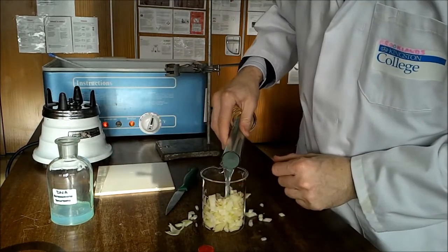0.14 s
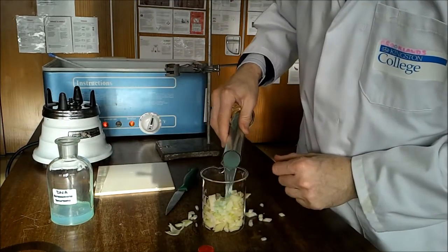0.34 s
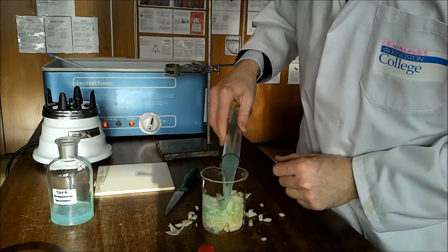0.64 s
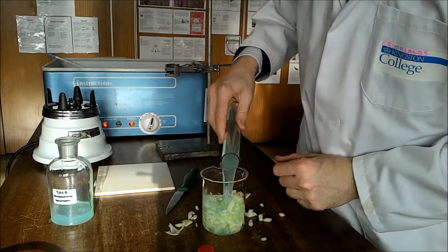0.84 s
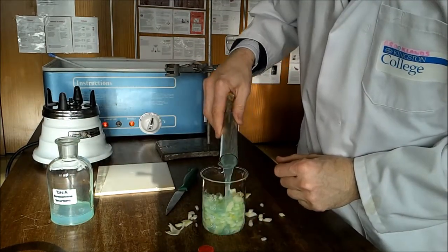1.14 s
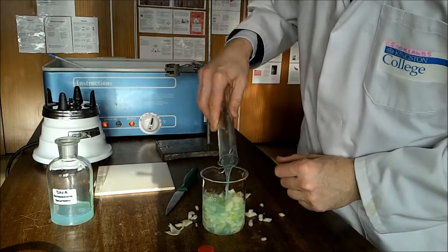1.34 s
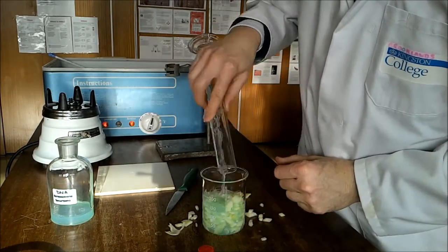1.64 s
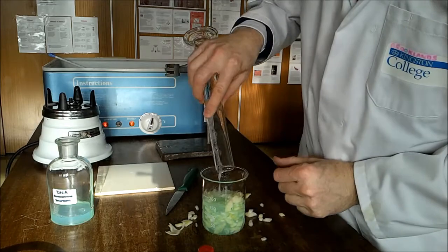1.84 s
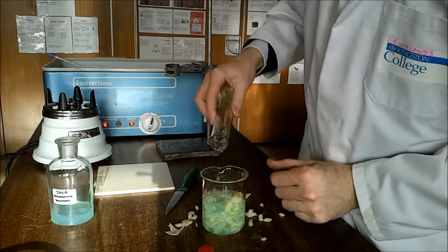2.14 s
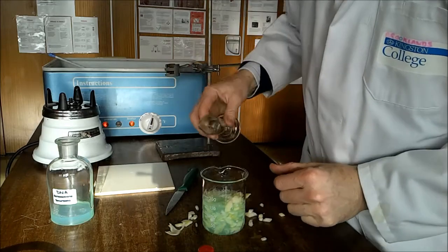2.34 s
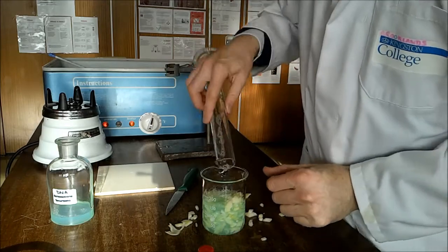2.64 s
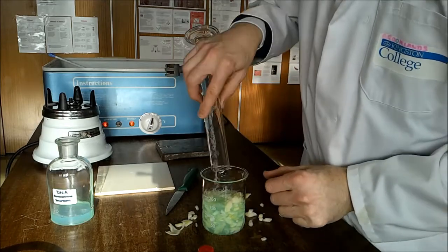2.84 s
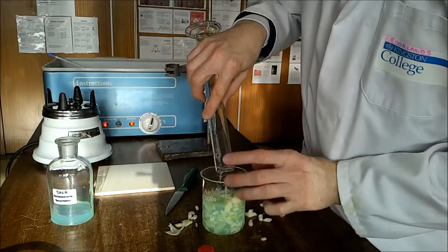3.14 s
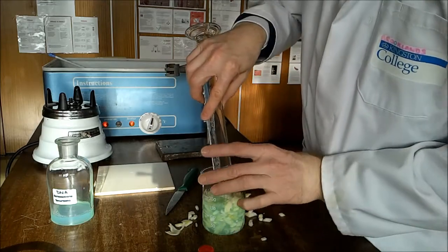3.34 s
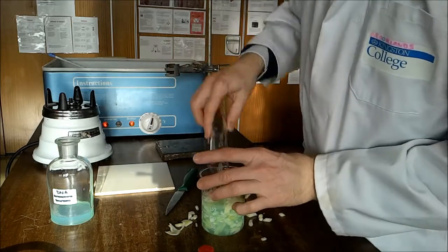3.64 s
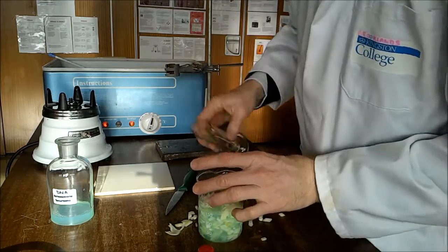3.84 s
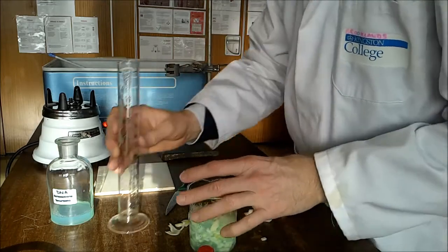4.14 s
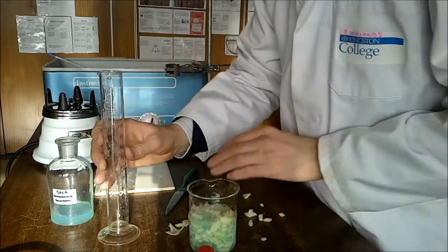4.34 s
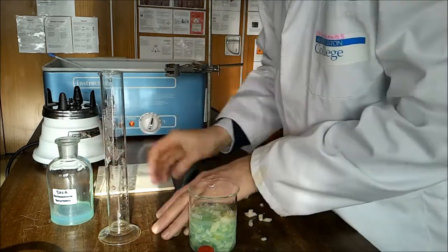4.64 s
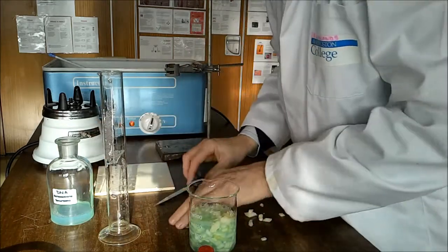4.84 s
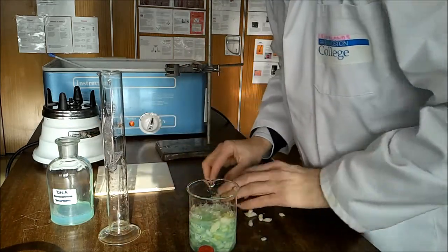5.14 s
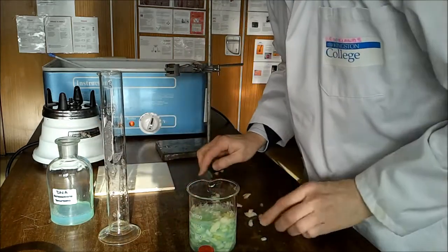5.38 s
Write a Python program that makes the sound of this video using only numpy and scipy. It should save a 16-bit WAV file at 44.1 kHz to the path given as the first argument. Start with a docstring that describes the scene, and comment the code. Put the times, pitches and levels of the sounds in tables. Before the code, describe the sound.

A small laboratory with low, steady ventilation air and slight hiss, heard close in mono. From about 0.5 to 1.5 s a thin stream trickles into chopped onion in a beaker: fine irregular ticks and small, high, wet plips, quite faint. A soft glass touch comes at 1.0 s and a light clink at 1.06. Clear, short clinks of the empty cylinder on the beaker rim follow at 1.5, 1.85, 3.0 and 3.3 s, with fainter touches at 3.5 and 3.6; between them it is nearly silent. Cloth brushes softly near 3.4 s. From 3.95 to 4.2 s the beaker bumps and scuffs dully. At 4.3 s the cylinder's heavy foot lands on the wooden bench, by far the loudest sound, a sharp ringing knock with a short room echo. Sleeves rustle around 4.6 s, a knife rasps waveringly at 4.85 to 5.0 s, and soft rustles fade to 5.6 s.

```python
"""A glass measuring cylinder is emptied over chopped onion in a beaker and tapped on the rim to shed the last drops.
Struck glass and wood are sums of dying tones plus a short crack; drops are rising bubble tones in a fine trickle.
The beaker is nudged, the cylinder is stood on the wooden bench with a knock, and a wavering, rasping knife is slid.
Coat sleeves and room air are coloured noise, small sounds echo in the room, and a gain control ducks loud blows."""
import sys
import numpy as np
from scipy import signal
from scipy.fft import irfft, next_fast_len
from scipy.io import wavfile
from scipy.ndimage import uniform_filter1d

SR = 44100
rng = np.random.default_rng(int(sys.argv[2]) if len(sys.argv) > 2 else 0)


def generate_wav(signal):
    """Clip the signal to [-1, 1] and save it as 16-bit WAV at the path in sys.argv[1]."""
    frames = np.transpose(np.atleast_2d(signal))
    scaled = np.clip(frames, -1, 1) * 32767
    pcm = np.round(scaled).astype(np.int16)
    wavfile.write(sys.argv[1], SR, pcm)


N = 242991
TIME_S = np.arange(N) / SR
POUR_START_S, POUR_FULL_S, POUR_END_S = 0.5, 1.5, 1.48  # the pour stops just before it would reach full flow


def amp(db):
    """Turns decibels into a gain."""
    return 10 ** (np.asarray(db) / 20)


def unit(x):
    """Scales a sound to an average (rms) level of 1."""
    return x / np.sqrt(np.mean(x ** 2) + 1e-20)


def read(points, hz):
    """Reads a table of (frequency, value) along a log-frequency axis."""
    f, value = np.transpose(points)
    return np.interp(np.log(hz + 1), np.log(f + 1), value)


def add(mix, s, sound):
    """Mixes a sound in, starting at s seconds."""
    part = mix[round(s * SR):][:len(sound)]
    part += sound[:len(part)]


def die_away(t, t60):
    """A fade that falls by 60 dB in t60 seconds."""
    return np.exp(-np.log(1000) * t / t60)


def swell(middle_s, half_s):
    """A smooth rise and fall, 1 at its middle."""
    return np.exp(-((TIME_S - middle_s) / half_s) ** 2)


def noise(spectrum, size):
    """Steady noise of rms 1: every frequency at its table level, each with a random phase."""
    padded = next_fast_len(size, True)
    hz = np.fft.rfftfreq(padded, 1 / SR)
    random_phase = np.exp(2j * np.pi * rng.random(len(hz)))
    return unit(irfft(amp(read(spectrum, hz)) * random_phase, padded)[:size])


def ring(modes, favoured_hz=0, favour_db=0, flip=1):
    """Struck tones dying away; the spot struck favours tones near one frequency."""
    t = np.arange(SR // 3) / SR
    hz, db, t60 = np.transpose(modes)[:, :, None]
    db = db + favour_db * np.exp(-(4 * (favoured_hz / hz - 1)) ** 2)
    # A flip below -1 makes neighbours swing oppositely and each later row a little stronger
    sense = flip ** np.arange(len(modes))
    return sense @ (amp(db) * die_away(t, t60) * np.sin(2 * np.pi * hz * t))


def crack(spectrum, t60, snap, snap_s, size=8192):
    """A crowd of short tones blurred together: a burst of noise with a sharp front."""
    t = np.arange(size) / SR
    burst = rng.choice([-1., 1.], size) * (die_away(t, t60) + snap * np.exp(-t / snap_s))
    log_gain = np.log(unit(amp(read(spectrum, abs(np.fft.fftfreq(size, 1 / SR))))))
    causal_filter = np.exp(signal.hilbert(log_gain).conj())  # colours the burst without smearing it earlier
    coloured = np.fft.ifft(np.fft.fft(burst) * causal_filter).real
    return unit(coloured) * np.std(burst)  # keeps the energy of the burst


def contact(x, corner_hz):
    """A softer, longer contact excites less treble, so this is a low-pass filter."""
    b, a = signal.butter(2, min(corner_hz, .45 * SR), fs=SR)
    return signal.lfilter(b, a, x)


# Ventilation and microphone hiss. Each row: frequency in Hz, relative level in dB.
AIR_COLOUR = [(24, -51), (40, -10), (69, -16.5), (103, 0), (150, -2.5), (247, -0.5), (280, -4.5),
              (359, -6.5), (417, -16), (606, -11.5), (758, -20), (1410, -25), (2270, -29.5), (8110, -35),
              (15500, -43)]


def air(level_db=-54.5):
    """Steady air of a small laboratory, made of coloured noise."""
    return amp(level_db) * noise(AIR_COLOUR, N)


# The colour of rubbing cloth, used for the splash of drops too. Each row: frequency in Hz, relative level in dB.
CLOTH_COLOUR = [(100, 2), (400, 21.5), (1000, 7.5), (2500, 6), (4000, 5), (6500, 3.5), (9000, -2),
                (12000, -10.5), (15500, -14)]
# Arm movements: reaching to steady the beaker, carrying the cylinder across, letting go of it,
# reaching for the knife, drawing back, and a last short rustle.
# Each row: middle in seconds, half length in seconds, level in dB.
SLEEVE_SWELLS = [(3.363, 0.24, -60.5), (4.122, 0.35, -66), (4.606, 0.13, -56.5), (4.85, 0.33, -64.5),
                 (5.147, 0.15, -63.5), (5.51, 0.073, -64.5)]


def sleeves(rest_db=-71.5, flutter_db=1.5):
    """Cloth brushing on cloth, slightly uneven and never quite still, swelling with each arm movement."""
    flutter = unit(uniform_filter1d(rng.standard_normal(N), size=900))
    power = amp(rest_db) ** 2
    for s, half_s, db in SLEEVE_SWELLS:
        power = power + (amp(db) * swell(s, half_s)) ** 2
    return np.sqrt(power) * amp(flutter_db * flutter) * noise(CLOTH_COLOUR, N)


def flow():
    """Rate of pouring: it builds from 0 almost to 1 as the cylinder tips, then stops."""
    return np.interp(TIME_S, [POUR_START_S, POUR_FULL_S], [0, 1]) * (TIME_S <= POUR_END_S)


# The ticking of the thin stream in the onion. Each row: frequency in Hz, relative level in dB.
TICK_COLOUR = [(800, -16), (1500, -3), (3000, 8), (4500, 8), (7000, -6), (9500, -19.5), (15500, -25)]


def trickle(ticks_per_s=110, spread_db=5.0, level_db=-78):
    """Fine, irregular ticks of liquid seeping between the pieces, stronger as the flow grows."""
    ticks = (rng.random(N) < ticks_per_s / SR) * amp(spread_db * rng.standard_normal(N))
    tick = crack(TICK_COLOUR, t60=0.014, snap=.5, snap_s=.0005, size=1024)
    seeping = unit(signal.oaconvolve(ticks, tick)[:N])
    return amp(level_db) * flow() * seeping


def small_drips(drips_per_s=45, level_db=-61, spread_db=2.5, bubble_hz=4900, spread_octaves=0.69):
    """Faint drops at random, more often the faster the pour; rows of (start s, level dB, bubble Hz)."""
    times = np.flatnonzero(rng.random(N) < flow() * drips_per_s / SR) / SR
    chance = rng.uniform(-1.07, 1, (len(times), 2))
    return [(s, level_db + spread_db * loud, bubble_hz * 2 ** (spread_octaves * high))
            for s, (loud, high) in zip(times, chance)]


# Single drops falling among the onion, most of them loud.
# Each row: start in seconds, level in dB, starting bubble pitch in Hz.
SINGLE_DRIPS = [(0.541, -53.5, 5600), (0.743, -56, 7400), (0.828, -59, 3330), (0.963, -63, 5160),
                (1.141, -50, 2820), (1.223, -52, 3000), (1.245, -51, 3900), (1.325, -58, 3830)]


def drips(t60=0.021, rise_per_s=2.6, splash=0.92):
    """Each drop traps a tiny bubble whose pitch rises as it dies, mixed with a splash of noise."""
    out, t = np.zeros(N), np.arange(SR // 20) / SR
    envelope = die_away(t, t60) * (1 - np.exp(-t / 0.00048))  # quick soft start
    for s, db, hz in [*SINGLE_DRIPS, *small_drips()]:
        bubble = np.sin(2 * np.pi * hz * t * (1 + rise_per_s * t / 2))
        wet = bubble + splash * noise(CLOTH_COLOUR, len(t))
        add(out, s, amp(db) * wet * envelope)
    return out


# Tones of the beaker, damped by its contents. Each row: frequency in Hz, relative level in dB,
# time to fall by 60 dB in seconds.
BEAKER_TONES = [(900, -3.5, 0.055), (945, -5.5, 0.077), (1284, -10.5, 0.13), (1484, -9, 0.034),
                (1760, -36, 0.062), (2050, -42, 0.053), (2396, -4, 0.037), (2480, -8, 0.045),
                (2520, -43, 0.076), (3160, -5.5, 0.013), (3560, -41, 0.031)]
# Tones of the cylinder's wall, held in the hand. Each row: frequency in Hz, relative level in dB,
# time to fall by 60 dB in seconds.
CYLINDER_TONES = [(5028, -18, .13), (5110, -18, .15), (5469, -21, .09), (5593, -22, .1), (6061, -22, .12),
                  (7230, -26, .08), (7650, -21, .04), (8130, -28, .07), (10664, -29, .04),
                  (11620, -34, .05), (13650, -36, .04)]
# Low tones of a tap: the thud of the bench and the hum of the room. Each row: frequency in Hz,
# relative level in dB, time to fall by 60 dB in seconds.
LOW_TONES = [(168, -39, 0.27), (240.7, -18, 0.73), (288, -8.5, 0.27), (306, -1, 0.19), (354.8, -9.5, 0.29),
             (510, -5, 0.066), (714.4, -9, 0.15), (912, -4.5, 0.067)]
# The crack of a tap, used for the beaker's scuffs too. Each row: frequency in Hz, relative level in dB.
TAP_CRACK_COLOUR = [(100, -17), (250, 8.5), (700, 5), (1400, -1), (2200, -4), (3200, -7), (3900, -18.5),
                    (4700, -12.5), (5400, -1), (6700, -15), (7700, -6), (9000, -21), (15500, -20.5)]
# Cylinder against beaker. Each row: start in seconds, strength in dB, low thud in dB
# relative to the strength, contact corner in Hz, frequency favoured by the spot struck in Hz.
RIM_TAPS = [(0.986, -59, -7, 2980, 2120), (1.0567, -41.5, 1.5, 10300, 1280), (1.5071, -30, 0, 9600, 490),
            (1.8540, -34, 3.5, 11500, 4830), (2.9951, -39, 0, 12300, 740), (3.2864, -34.5, 3, 13500, 2920),
            (3.5297, -49, 2.5, 5070, 940), (3.638, -61, 9.5, 3060, 2460)]


def taps(favour_db=8.0, wet_pitch=0.91, beaker_db=-2.5, cylinder_db=-2, crack_db=1.86):
    """Each tap rings both glasses and thuds through the beaker into the bench, with the room humming along."""
    out = np.zeros(N)
    for s, db, thud_db, corner_hz, spot_hz in RIM_TAPS:
        # The glass rings lower while the cylinder is still heavy with liquid
        pitch = wet_pitch if s < POUR_FULL_S else 1
        beaker = ring(np.multiply(BEAKER_TONES, [pitch, 1, 1]), spot_hz, favour_db, flip=-1.022)
        cylinder = ring(np.multiply(CYLINDER_TONES, [pitch, 1, 1]), spot_hz, favour_db, flip=-1.145)
        glass = amp(beaker_db) * beaker + amp(cylinder_db) * cylinder
        click = amp(crack_db) * crack(TAP_CRACK_COLOUR, t60=0.04, snap=0.44, snap_s=0.0012)
        thud = ring(LOW_TONES, spot_hz, favour_db)
        add(out, s, amp(db) * contact(glass, corner_hz))
        add(out, s, amp(db) * contact(click, corner_hz))
        add(out, s + 0.00165, amp(db + thud_db) * thud)  # the low tones answer a moment later
    return out


# The beaker's base bumps and drags on the bench. Each row: start in seconds, thud level in dB,
# scuff level in dB, contact corner in Hz, time for the scuff to fall by 60 dB in seconds.
BEAKER_NUDGES = [(3.949, -34, -44, 1100, 0.18), (3.9738, -39.5, -44, 550, 0.34),
                 (4.101, -40.5, -48, 400, 0.34), (4.158, -43, -49.5, 458, 0.46)]


def nudges():
    """The hand shifts the beaker: dull bumps and short drags with no glassy ring."""
    out, thud = np.zeros(N), ring(LOW_TONES)
    for s, thud_db, scuff_db, corner_hz, t60 in BEAKER_NUDGES:
        scuff = crack(TAP_CRACK_COLOUR, t60, snap=0.11, snap_s=.003)
        add(out, s, amp(thud_db) * contact(thud, corner_hz))
        add(out, s, amp(scuff_db) * contact(scuff, corner_hz))
    return out


# Tones of the cylinder standing on the bench. Each row: frequency in Hz, relative level in dB,
# time to fall by 60 dB in seconds.
FOOT_TONES = [(172, -10, .36), (279, -2, .16), (344, 3, .23), (430, 1, .25), (498, -2, .14), (596, 0, .13),
              (678, -8, .23), (764, -1, .11), (848, -5, .09), (920, -2, .11), (1006, -14, .18),
              (1108, -18, .22), (1243, -23, .26), (1361, -22, .2), (1598, -24, .22), (2360, -19, .12),
              (2435, -4, .065), (5500, -12, .04), (5577, -15, .16), (6072, -24, .17), (7200, -32, .18),
              (8591, -22, .07), (9598, -33, .06), (11950, -43, .06), (13650, -46, .08)]
# The crack of the foot on the wood. Each row: frequency in Hz, relative level in dB.
FOOT_CRACK_COLOUR = [(30, -15), (100, -21), (300, 4), (800, 8.5), (1300, -9.5), (2500, -13.5), (3700, -36),
                     (4800, -30), (5800, -11.5), (8000, -26), (11000, -31.5), (15500, -58)]
# The cylinder's foot lands and rocks flat. Each row: start in seconds, ring level in dB,
# crack level in dB, contact corner in Hz.
FOOT_LANDINGS = [(4.2966, -13.5, -8, 8970), (4.3088, -35, -15, 10900)]


def landing():
    """The heavy foot of the cylinder knocks on the wood: ringing tones and a sharp crack."""
    out, foot = np.zeros(N), ring(FOOT_TONES)
    for s, ring_db, crack_db, corner_hz in FOOT_LANDINGS:
        knock = crack(FOOT_CRACK_COLOUR, t60=0.056, snap=0.95, snap_s=0.0027)
        add(out, s, amp(ring_db) * contact(foot, corner_hz))
        add(out, s, amp(crack_db) * contact(knock, corner_hz))
    return out


# Resonances of the knife chattering on the bench. Each row: frequency in Hz,
# average (rms) waver of that frequency in Hz, relative level in dB.
KNIFE_TONES = [(461, 49, 2.5), (868, 14, -1), (934, 33, 3), (1520, 4.6, -7.5), (1810, 27, -13.5),
               (2230, 10, -24)]
# The dry rasp under them. Each row: frequency in Hz, relative level in dB.
RASP_COLOUR = [(100, -4), (480, 3), (730, -16), (900, 0), (1150, -13), (1400, -14), (1800, -15),
               (2100, -24), (4000, -35), (12000, -60)]


def knife(rasp_db=4.5, start_s=4.848, attack_s=0.021, hold_s=0.087, release_s=0.026, slide_db=-45,
          catch_s=4.918, catch_width_s=0.0082, catch_db=6):
    """Stick and slip keep the knife's tones wavering over a rasp; one stroke, catching once on the way."""
    size = SR // 4
    body = amp(rasp_db) * noise(RASP_COLOUR, size)
    for hz, waver_hz, db in KNIFE_TONES:
        waver = waver_hz * unit(uniform_filter1d(rng.standard_normal(size), size=300))
        phase = 2 * np.pi * np.cumsum(hz + waver) / SR
        body += amp(db) * np.sqrt(2) * np.sin(phase)
    corners_s = np.cumsum([0, attack_s, hold_s, release_s])
    stroke = np.interp(np.arange(size) / SR, corners_s, [0, 1, 1, 0])
    out = np.zeros(N)
    add(out, start_s, stroke * unit(body))
    return amp(slide_db + catch_db * swell(catch_s, catch_width_s)) * out


# How long the room echoes. Each row: frequency in Hz, time to fall by 60 dB in seconds.
ROOM_DECAY = [(150, 0.38), (400, 0.61), (1200, 0.37), (3000, 0.2), (6000, 0.71), (14000, 0.34)]


def room(x, bass_db, mid_db, treble_db, build_s):
    """Dense reflections that build up, then die at a rate set by frequency."""
    hz, t, grains = signal.stft(rng.choice([-1., 1.], SR // 2), SR, nperseg=256)
    decay = die_away(t, read(ROOM_DECAY, hz)[:, None]) * (1 - np.exp(-(t / build_s) ** 2))
    decay /= np.sqrt(np.mean(decay ** 2, axis=1, keepdims=True) * SR / 2)  # equal energy at each frequency
    colour = amp(read([(250, bass_db), (1800, mid_db), (7000, treble_db)], hz))
    tail = signal.istft(grains * decay * colour[:, None], SR, nperseg=256)[1]
    return signal.fftconvolve(x, tail)[:N]


def scene(low_cut_hz=100, knock_room_db=-4.):
    """Glassware and knife in the room, over cloth and steady air."""
    b, a = signal.butter(2, low_cut_hz, "high", fs=SR)  # the microphone picks up little deep bass
    small = signal.lfilter(b, a, trickle() + drips() + taps() + nudges() + knife())
    knock = signal.lfilter(b, a, landing())
    into_room = small + amp(knock_room_db) * knock
    echo = room(into_room, bass_db=-11, mid_db=-7.0, treble_db=-24.5, build_s=0.012)
    return (small + knock + echo + sleeves() + air())[None]


def record(dry, threshold_db=-20.0, recover_db_per_s=8.5, edge_hz=15600):
    """Gain control drops at once on a loud blow and creeps back; then the treble is cut off at the edge."""
    power_db = 10 * np.log10(abs(uniform_filter1d(dry[0] ** 2, size=400)) + 1e-12)
    fall = TIME_S * recover_db_per_s
    held_db = np.maximum.accumulate(power_db + fall) - fall  # jumps to each peak, then sinks steadily
    over_db = np.maximum(held_db - threshold_db, 0)
    ducked = dry / amp(uniform_filter1d(over_db, size=60))
    band_limit = signal.firwin(511, edge_hz, window=("kaiser", 9), fs=SR)
    return signal.oaconvolve(ducked, band_limit[None], "same")


dry = scene()
out = record(dry)
generate_wav(out)
```